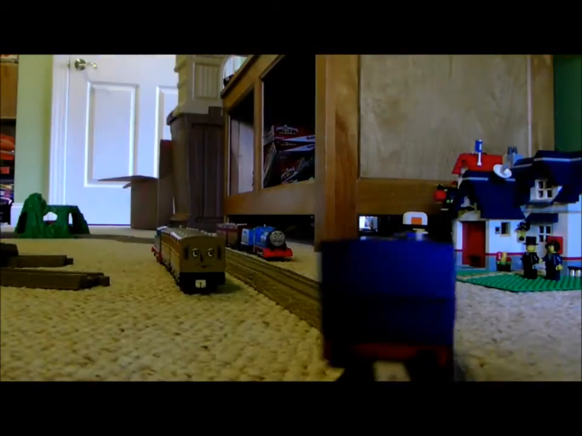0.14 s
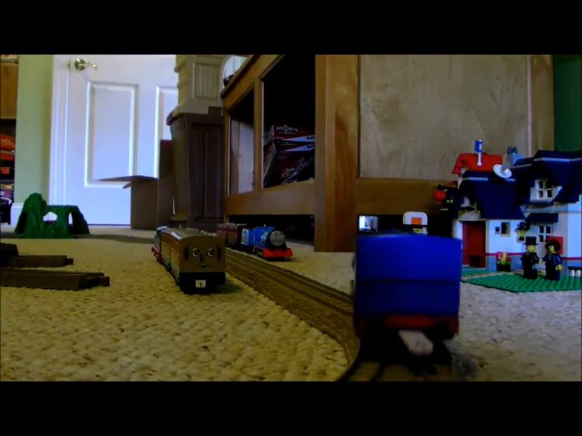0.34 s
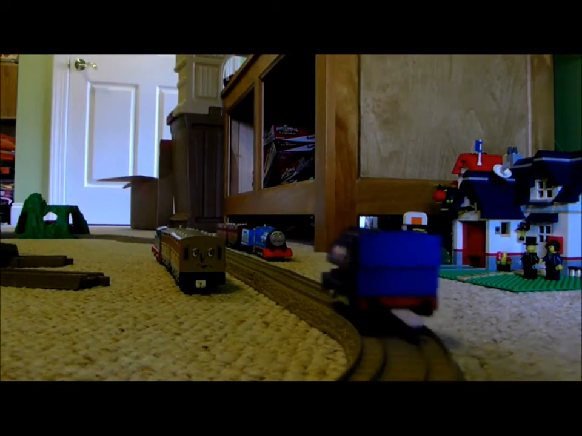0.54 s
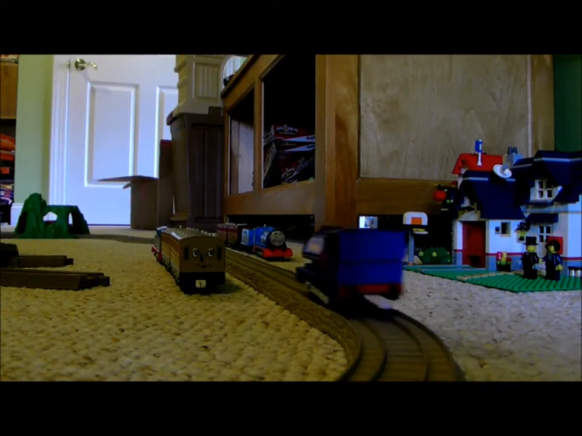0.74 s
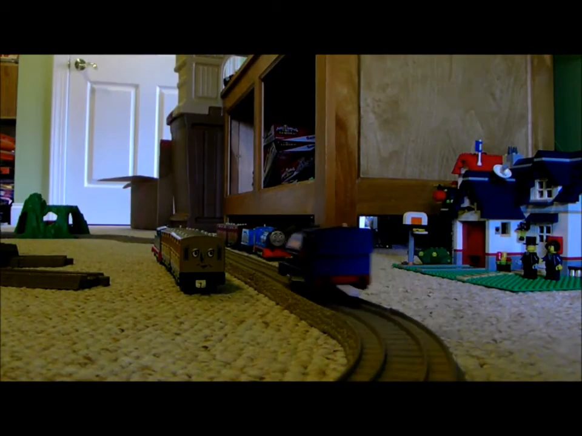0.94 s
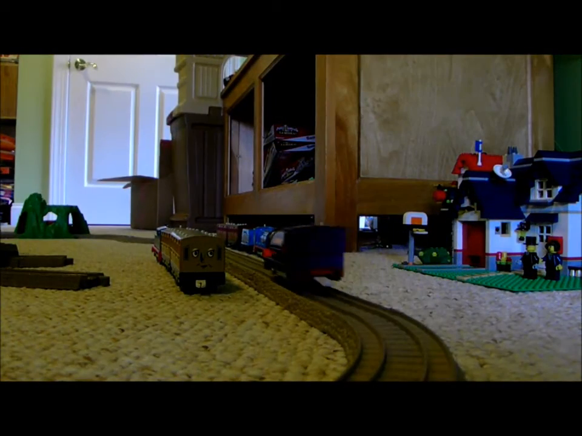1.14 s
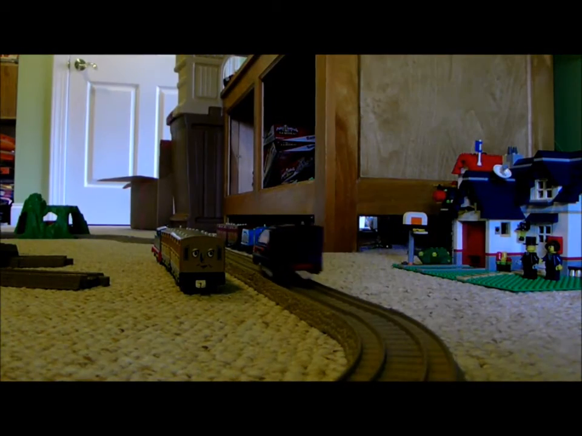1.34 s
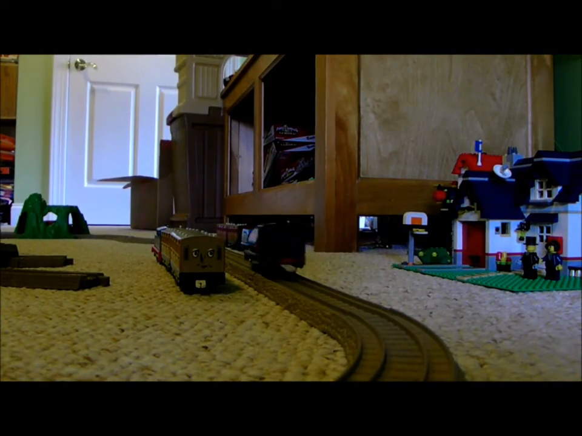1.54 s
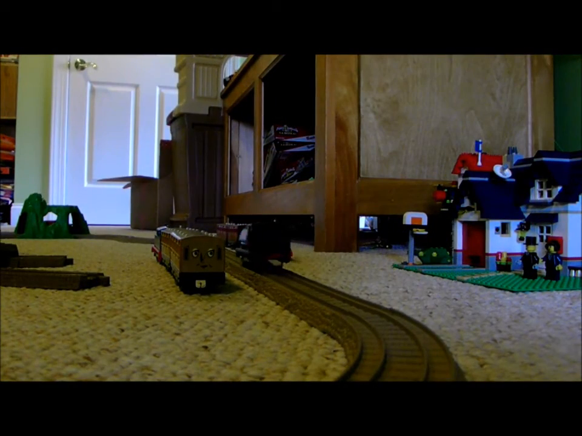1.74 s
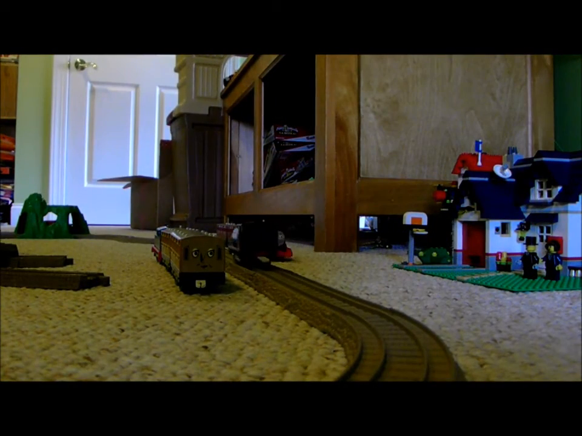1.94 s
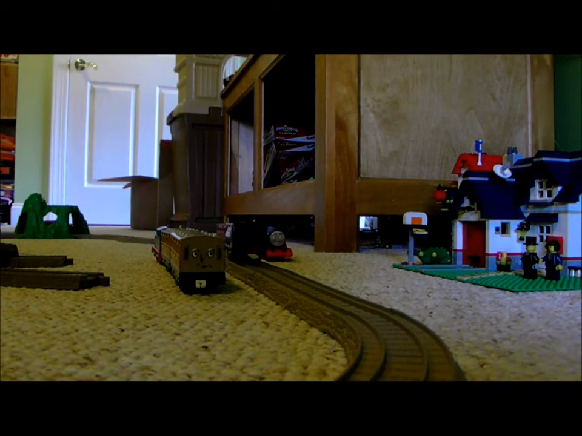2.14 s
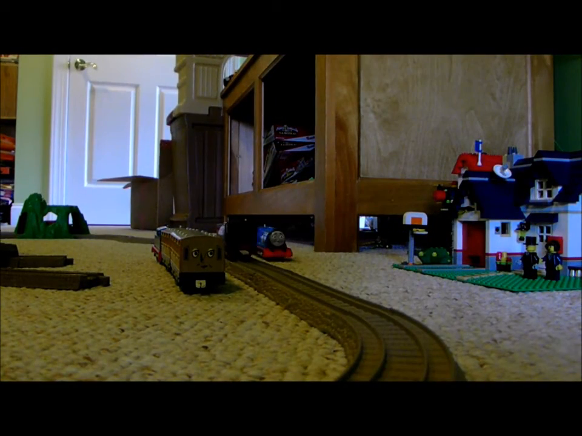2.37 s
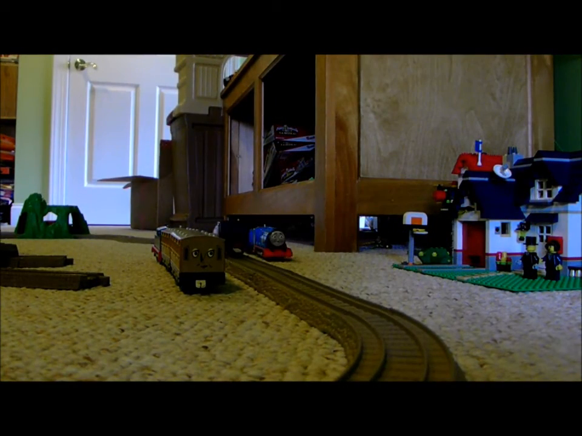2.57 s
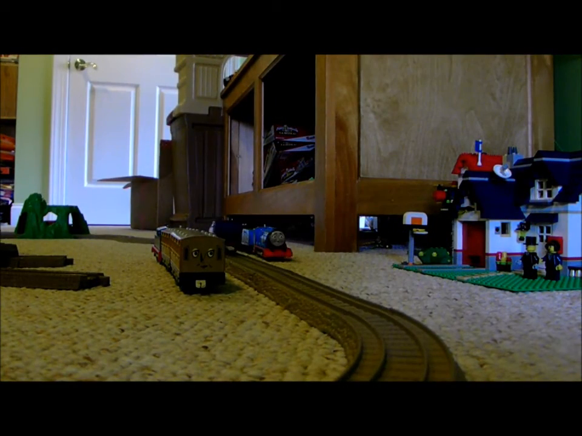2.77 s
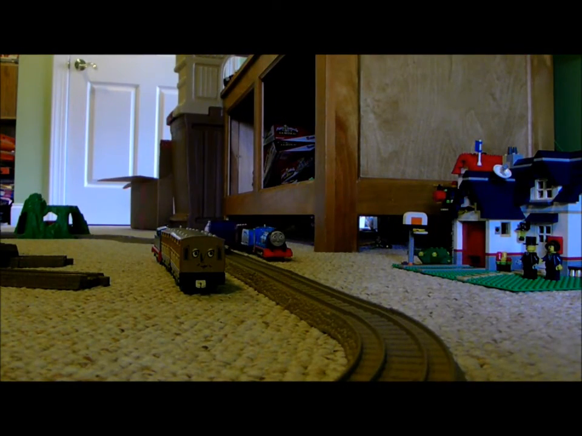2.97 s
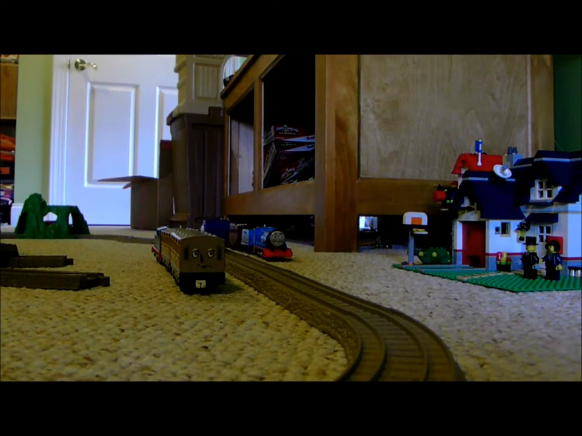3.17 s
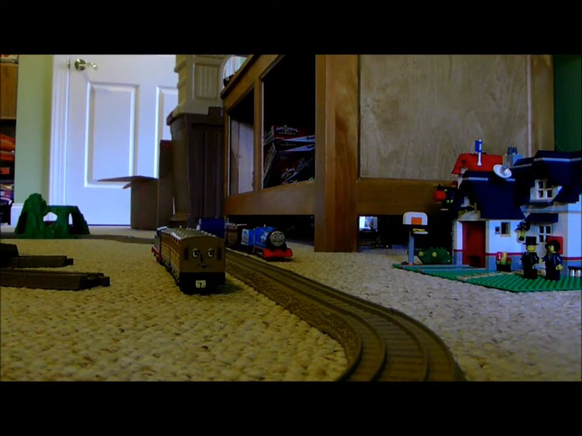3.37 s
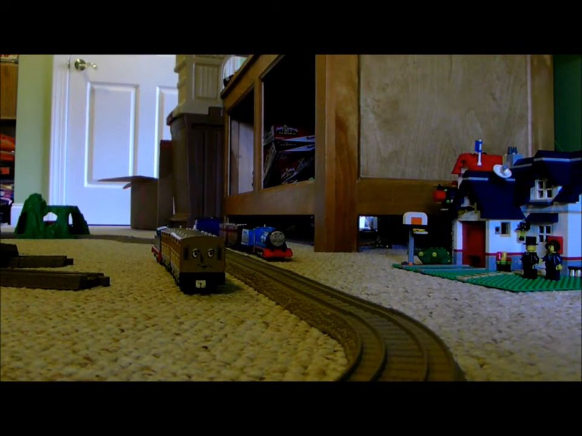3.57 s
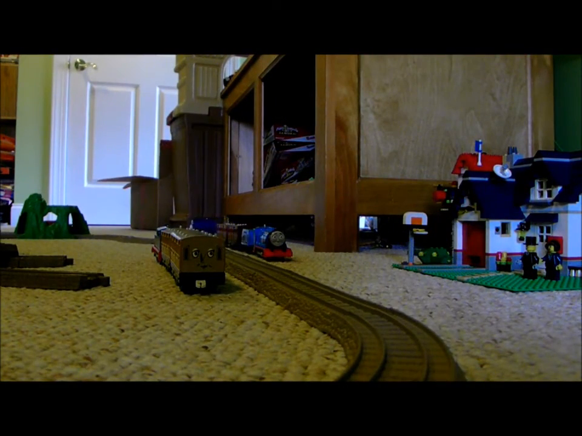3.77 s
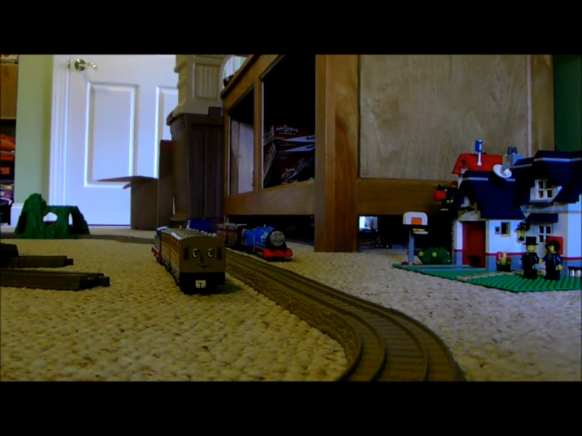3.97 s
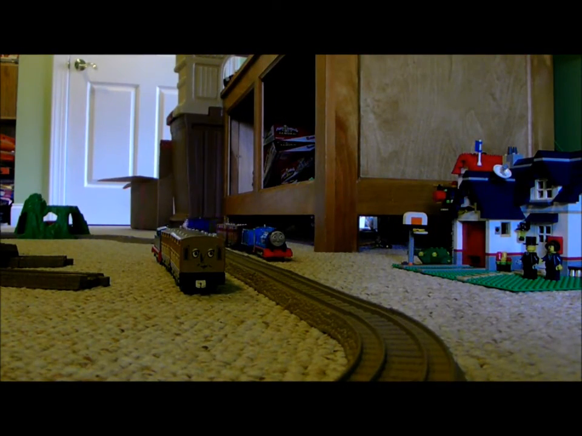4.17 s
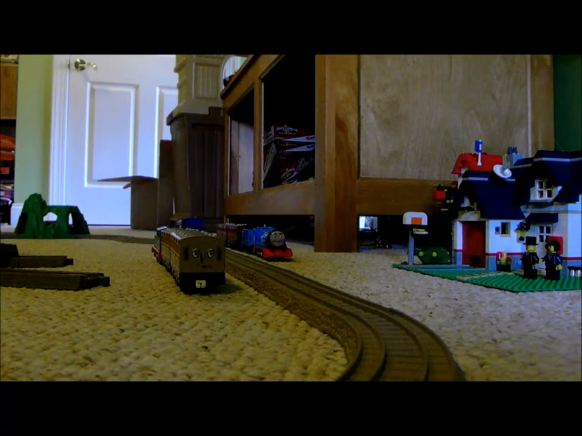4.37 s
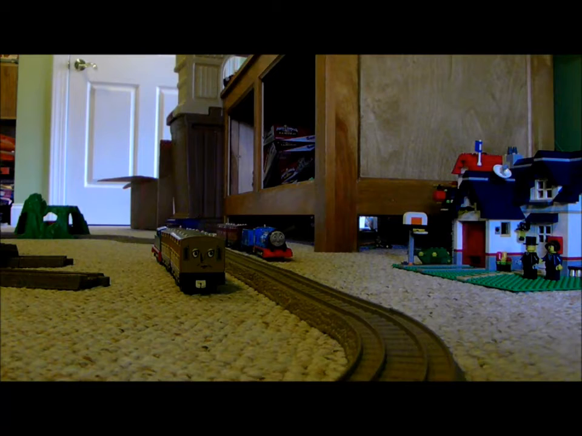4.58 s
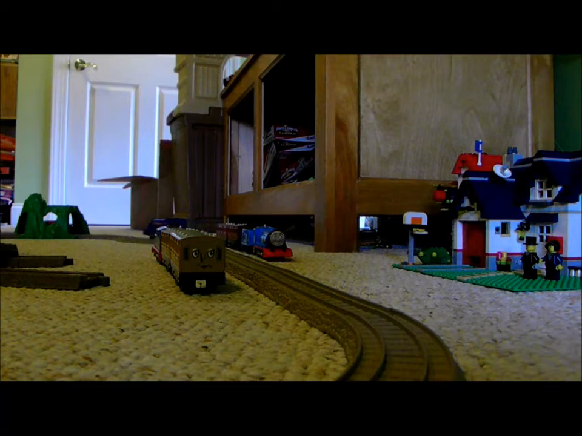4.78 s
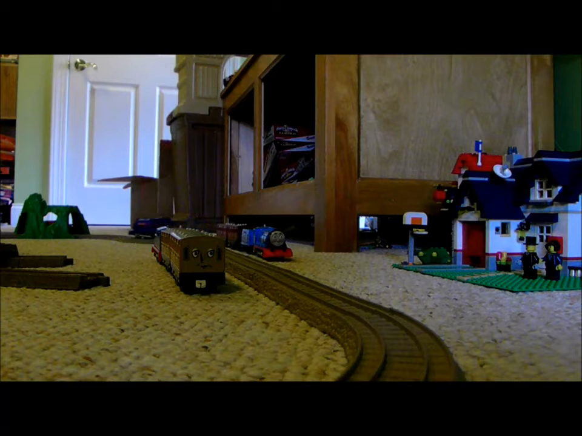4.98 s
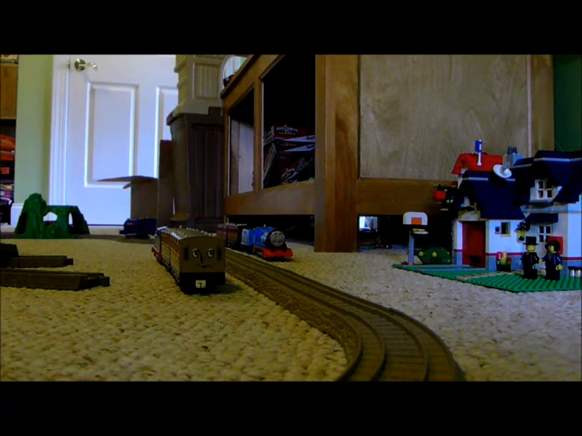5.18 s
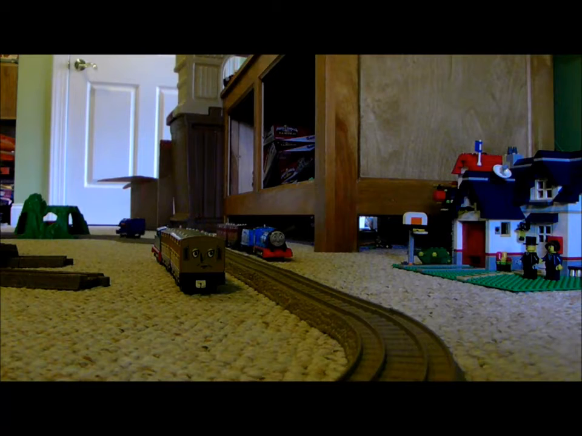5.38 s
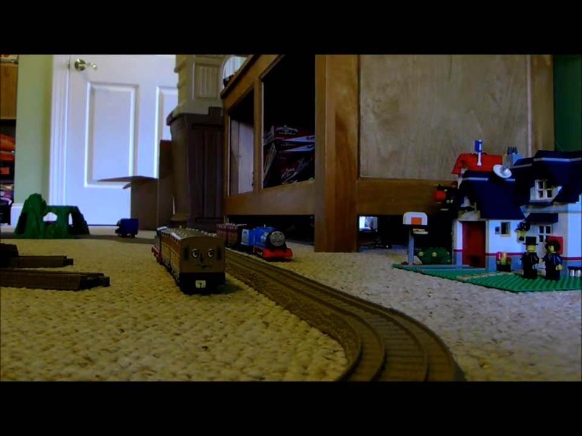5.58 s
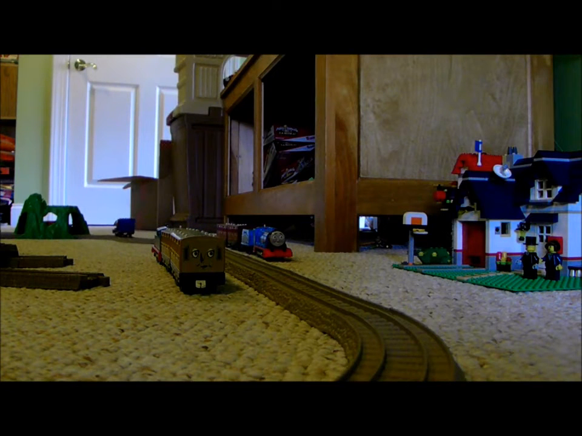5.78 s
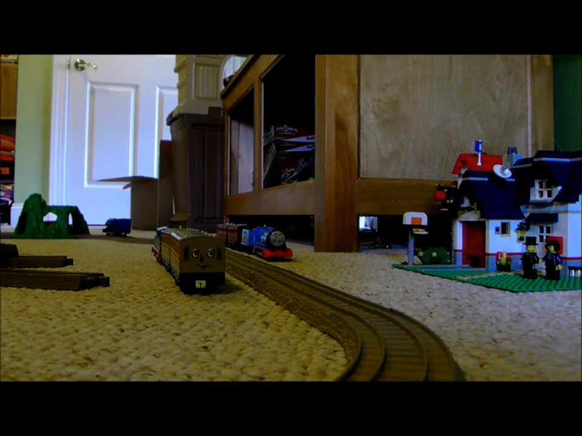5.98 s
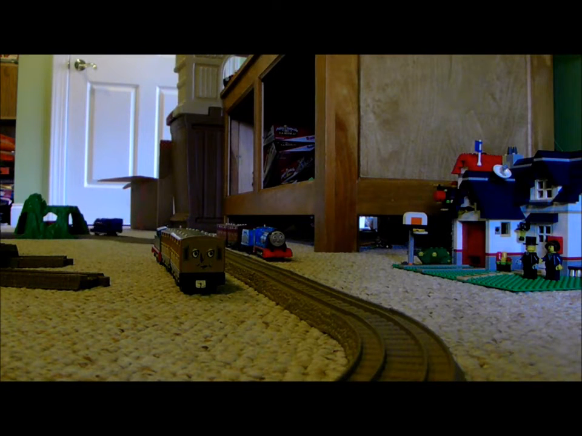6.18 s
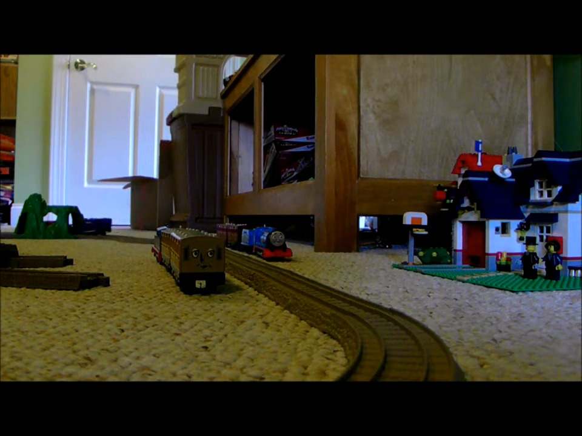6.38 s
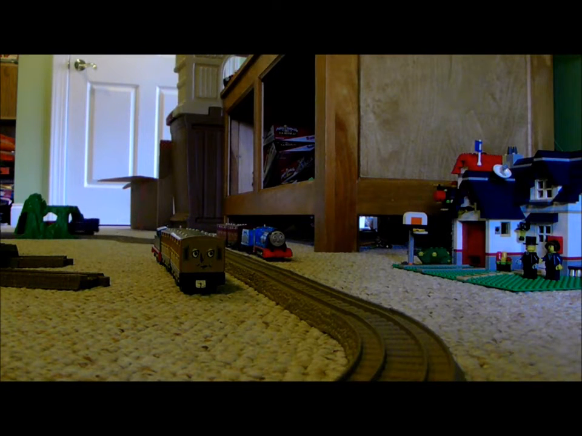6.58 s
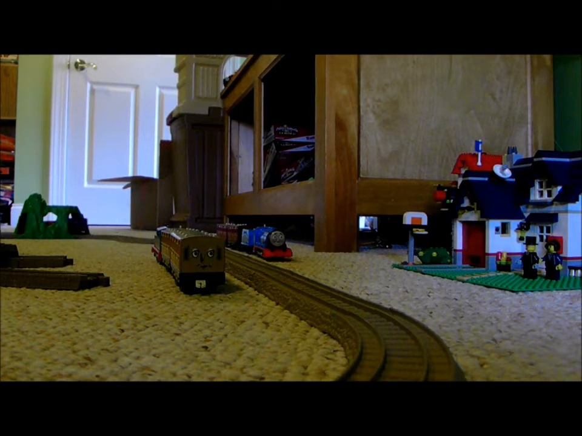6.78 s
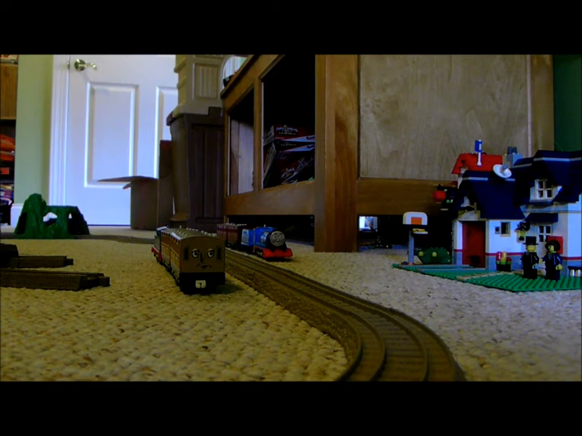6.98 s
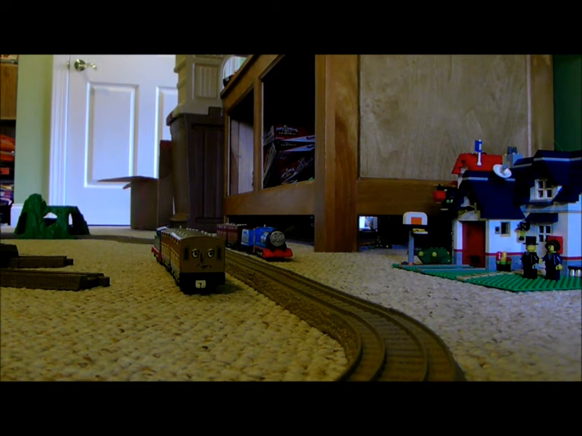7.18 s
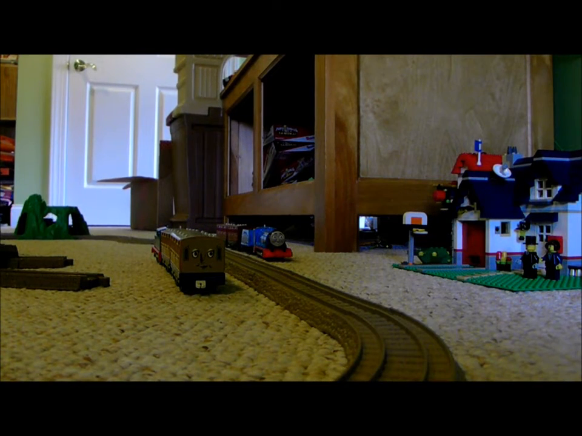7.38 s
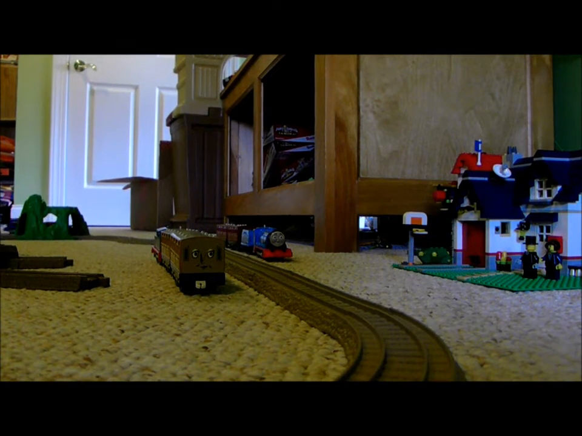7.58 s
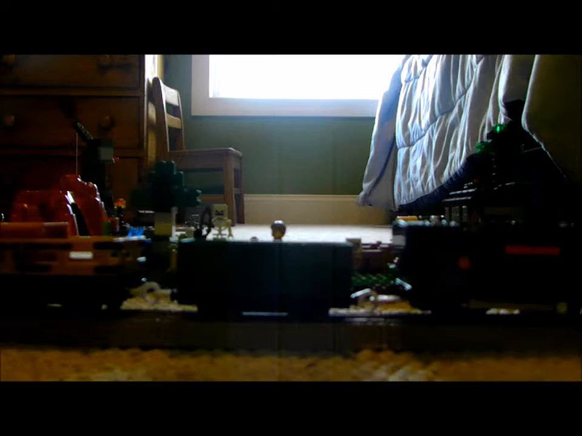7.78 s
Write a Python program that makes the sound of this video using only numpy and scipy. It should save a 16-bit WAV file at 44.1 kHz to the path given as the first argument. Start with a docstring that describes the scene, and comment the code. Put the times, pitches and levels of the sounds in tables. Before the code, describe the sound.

A battery toy train rattles harshly past on plastic track, its loose gears buzzing and whining, then runs on thinner and quieter across the room.

```python
"""The loose gears of a battery toy train rattle in its plastic shell as it runs away over plastic track on a carpet:
random tooth contacts are filtered by the shell and chassis, and their level follows the turning of the pinion.
A 14-tooth pinion on the small motor makes the mesh whine at multiples of the tooth rate. The wheels roll as
filtered noise, sharp gear slaps are bursts of contacts, and rail joints and one bump ring damped modes.
One small microphone hears it all through a notch, soft rounding of peaks and a steep upper cutoff."""
import sys
import numpy as np
from scipy import signal
from scipy.fft import rfft, irfft, next_fast_len
from scipy.io import wavfile

SR = 44100
rng = np.random.default_rng(int(sys.argv[2]) if len(sys.argv) > 2 else 0)


def wav_record(signal):
    """Record a signal, one row per channel, as 16-bit PCM in the file named by sys.argv[1]."""
    frames = np.transpose(np.atleast_2d(signal))
    bounded = np.clip(frames, -1, 1)
    # unit amplitude maps onto the largest positive 16-bit level
    quanta = np.round(bounded * 32767).astype(np.int16)
    wavfile.write(sys.argv[1], SR, quanta)


N = 344903   # length in samples

# Gear mesh. Each row: time in seconds, tooth rate in Hz before slack and jitter, whine level in dB before lulls.
MESH_COURSE = [(0, 1110, -39), (.1, 1080, -39), (.69, 1062, -40), (.85, 1109, -41), (1.6, 1107, -41),
               (1.94, 1098, -40), (2.3, 1120, -42), (2.8, 1129, -43.5), (3.45, 1109, -41.5),
               (3.8, 1117, -43.5), (4.3, 1114, -44.5), (4.9, 1095, -48), (5.2, 1095, -41),
               (5.5, 1081, -40.5), (5.8, 1115, -44), (6.2, 1088, -42), (6.4, 1112, -41.5),
               (7.0, 1112, -43.5), (7.5, 1106, -42), (7.82, 1072, -60)]
# Harmonics of the mesh. Each row: multiple of the tooth rate, mean level in dB relative to the whine.
WHINE_HARMONICS = [(1, -24.5), (2, 0.5), (3, -6.5), (4, -2.5), (5, -16)]
# Running noise before lulls and beats. Each row: time in seconds, shell rattle in dB, then in dB above the shell:
# thin upper rattle, finest fizz, chassis buzz.
RATTLE_COURSE = [(0, -15.5, -8, -16, -9), (0.15, -16, -10, -19, -10), (0.45, -19.5, -11.5, -23, -13),
                 (0.75, -17.5, -16.5, -21, -16.5), (1.2, -20, -15.5, -19, -12.5),
                 (1.7, -22, -12, -16, -10.5), (2.3, -22.5, -7, -15, -11), (2.7, -25, -8, -14.5, -11.5),
                 (3.3, -25.5, -5, -13, -9.5), (3.7, -25.5, -5.5, -14, -10), (4.3, -25, -5, -10, -8.5),
                 (4.8, -24, -7, -15, -10), (5.1, -26, -8, -14.5, -6.5), (5.6, -24, -6, -15, -8.5),
                 (6.1, -24, -10.5, -13, -8.5), (6.7, -25.5, -10.5, -16, -9.5),
                 (7.2, -26.5, -7.5, -12.5, -7.5), (7.82, -24, -10, -13.5, -7.5)]
# Wheels rolling on the rails. Each row: time in seconds, level in dB before lumps and dips.
ROLL_COURSE = [(0.0, -41), (0.52, -48.5), (1.79, -48), (4.31, -48.5), (5.1, -47), (6.88, -48),
               (7.82, -46.5)]
# Radiation spectra before the body resonances. Each row: frequency in Hz, relative level in dB per Hz.
SHELL_SPECTRUM = [(2240, -37), (3800, -40.5), (4190, -38), (4580, -2.5), (5140, -3.5), (5570, 1),
                  (6240, 3.5), (7110, -1), (7750, -2.5), (8000, -5.5), (10400, -58), (17600, -120)]
UPPER_SPECTRUM = [(7000, -15), (7800, -5), (8700, 1.5), (9800, 1), (10600, -2), (11150, -5.5),
                  (11500, -43.5), (12500, -36)]
FIZZ_SPECTRUM = [(10800, -19), (11500, -3), (13000, -5), (14200, -3), (14800, -15), (15600, -9.5)]
CHASSIS_SPECTRUM = [(530, -34), (900, -18.5), (1090, -19), (1860, -9.5), (2190, -6), (2810, -6),
                    (3260, -2.5), (4180, -3.5), (4500, -2), (5850, -37), (9900, -120)]
RAIL_SPECTRUM = [(12, -49), (20, -17), (91, -15), (187, -17), (339, -6.5), (543, -6), (1040, -1.5),
                 (1110, 8), (1190, -5), (1300, 0), (1690, -1), (2860, -120)]
# Resonances of shell and chassis. Each row: frequency in Hz, width in Hz, lift in dB (negative for a hollow).
BODY_RESONANCES = [(269, 28, 3), (420, 16, 1.5), (2034, 53, 4), (2510, 210, 3), (3350, 40, 2.5),
                   (4630, 250, -2.5), (4840, 150, 3), (5480, 130, 5), (5680, 90, 2), (5820, 110, 3),
                   (6050, 120, 2), (6290, 110, 3.5), (6930, 180, 4.5), (7000, 104, 2.5), (8540, 250, 3),
                   (10240, 250, 6), (10227, 540, -13), (10200, 880, 9), (13300, 500, -1.5),
                   (14100, 500, -2)]
# Sharp slaps of the loose gears. Each row: start in seconds, burst level in dB, length of the fade in seconds.
GEAR_SLAPS = [(.075, -20, .011), (0.122, -18, 0.054), (0.237, -13, 0.02), (0.326, -10, .03),
              (.416, -11.5, .015), (0.453, -13.5, 0.013), (0.496, -14.5, 0.011), (.528, -10.5, .009),
              (0.551, -14.5, 0.023), (0.594, -16, .021), (0.647, -14.5, 0.022), (0.772, -15.5, .014),
              (.857, -23, 0.04), (0.903, -17.5, 0.0087), (0.95, -12.5, 0.011), (1.06, -19, 0.015),
              (1.164, -23.5, .027), (1.254, -18.5, 0.02), (1.342, -17, 0.015), (1.48, -18, 0.012),
              (1.541, -17.5, 0.027), (1.62, -20, .014), (1.694, -21.5, 0.0097), (1.772, -22, .02),
              (1.84, -29, 0.072), (2.079, -23, .02), (2.162, -26, 0.036), (2.224, -26, .009),
              (2.331, -26, 0.0092), (2.507, -20, 0.018), (2.813, -26, .02), (3.054, -20, .015),
              (3.104, -21.5, 0.029), (3.262, -20.5, 0.028), (3.356, -20, 0.034), (3.6, -26, .027),
              (3.651, -29, 0.036), (4.13, -19, 0.023), (4.372, -22.5, .036), (4.84, -23.5, 0.044),
              (5.17, -27, 0.042), (5.371, -24.5, 0.058), (5.573, -26, .046), (5.69, -28, 0.053),
              (5.913, -28, .018), (6.087, -21.5, .024), (6.163, -22, .048), (6.391, -24.5, 0.03),
              (6.7, -29, 0.041), (7.169, -27.5, .042), (7.323, -23, 0.034), (7.5, -24, 0.025),
              (7.611, -21, 0.056)]
# Wheels over rail joints. Each row: time in seconds, strength of the blow in dB.
JOINT_BLOWS = [(0.274, -32), (0.321, -31.5), (0.42, -29), (0.615, -41), (0.717, -28.5), (1.124, -35),
               (1.319, -26), (1.418, -30.5), (1.517, -33), (1.622, -29), (1.715, -31), (1.819, -25.5),
               (3.37, -37), (5.114, -47), (5.383, -34), (7.715, -35)]
# Modes of the track. Each row: frequency in Hz, mean level in dB, 60 dB decay time in seconds.
TRACK_MODES = [(421, -18.5, 0.19), (527.5, -6.5, 0.036), (763, -9, .025), (970, -15, 0.028)]
# Bump of a coupling or wagon. Each row: time in seconds, strength of the blow in dB.
BUMP_BLOWS = [(5.662, -16.5)]
# Modes of the wagon. Each row: frequency in Hz, mean level in dB, 60 dB decay time in seconds.
WAGON_MODES = [(141.4, -32, 0.13), (424.4, -27, 0.22), (1070, -6, .04), (1370, -4, 0.034),
               (1730, -10, 0.05), (2300, 1, 0.0076), (3220, 4, 0.0045)]
# The drive goes slack and the rattle sinks. Each row: time in seconds, change of shell level in dB.
SLACK_LULLS = [(0.2, -2.5), (0.49, -2.5), (0.82, -4.0), (1.02, -4.0), (1.31, -1.76), (1.73, -4.0),
               (2.01, -5), (2.28, -2.5), (2.57, -3.5), (3.0, -2.5), (3.21, -1.38), (3.52, -4.5), (3.76, -3),
               (4.01, -3), (4.48, -2.5), (5.05, -5.5), (5.34, -3.5), (5.54, -2.5), (5.66, -3.5), (5.79, -5),
               (6.28, -2.5), (6.58, -4.0), (6.81, -3), (7.08, -3), (7.28, -3), (7.4, -2.5), (7.58, -2.5)]
# Broad noise falls away and thin tones sound through the gap. Each entry: time in seconds.
DIP_TIMES = [0.342, .851, 1.148, 1.192, 2.557, 2.707, 3.283, 3.41, 3.452, 4.007, 4.861, 4.991, 5.46, 5.543,
             6.183, 6.292, 6.696, 6.741, 6.804, 6.929, 7.634]

TEETH = 14
UPPER_FOLLOWS, FIZZ_FOLLOWS, CHASSIS_FOLLOWS, WHINE_FOLLOWS = 1.3, 0.77, 0.42, 1.8   # dB per dB of lull
SLACK_HZ_PER_DB, SLOWING_S = 14, 0.12   # gain in tooth rate, time constant of the speed
LULL_S = 0.035   # spread of the bell shape
DIP_S, DIP_DB = 0.0045, -18   # spread of the bell shape, depth
DIP_TONE_S, DIP_TONE_DB = 0.013, -10.5   # spread of the bell shape, level of each tone against the contacts
SLAP_RISE_S = 0.0029   # time constant
JOINT_CONTACT_S, BUMP_CONTACT_S = 0.004, 0.0017
NOTCH_HZ, NOTCH_WIDTH_HZ = 7850, 930
CUTOFF_HZ = 15730


def from_db(db):
    """Level law: amplitude is ten to the power of a twentieth of the decibels."""
    return 10 ** (np.asarray(db) / 20)


def rms_one(x):
    """Normalisation: a signal divided by its effective value has unit power."""
    return x / np.sqrt(np.mean(x ** 2) + 1e-20)


def in_time(rows):
    """Linear interpolation: each column after the first becomes a course in time."""
    seconds, *columns = np.transpose(rows)
    return [np.interp(np.arange(N) / SR, seconds, column) for column in columns]


def drift(rate_hz):
    """Low-pass random process: noise through two equal one-pole filters wanders slowly, with rms 1."""
    pole = np.exp(-20 * np.pi * rate_hz / SR)   # computed at a tenth of the sample rate
    noise = rng.standard_normal(N // 10 + 4002)
    slow = signal.lfilter([1], [1, -2 * pole, pole * pole], noise)[4000:]   # start-up discarded
    return np.interp(np.arange(N) / 10, np.arange(len(slow)), rms_one(slow))


def hollows(rows, spread_s):
    """Superposition of level changes: a bell-shaped hollow in dB at each listed moment."""
    t = np.arange(N) / SR
    return sum(db * np.exp(-0.5 * ((t - at_s) / spread_s) ** 2) for at_s, db in rows)


def whine(mesh, whine_db):
    """Gear-mesh harmonics: phase jitter blurs the upper ones most; the off-centre pinion makes them throb each turn."""
    throb = 1 + 0.27 * np.cos(mesh / TEETH + 1.2 * drift(24))
    wobble = 0.073 * np.sin(mesh / TEETH + 0.51 * drift(7.4)) + 0.36 * drift(37)
    lines = 0
    for multiple, db in WHINE_HARMONICS:
        level = from_db(db + 3.3 * drift(29))
        lines = lines + level * np.sin(multiple * (mesh + wobble) + 0.5 * drift(5.7))
    return np.sqrt(2) * from_db(whine_db) * throb * lines


def contacts(per_s, size_db, share):
    """Impulsive excitation: random tooth contacts of uneven size over a bed of sliding friction."""
    sizes = from_db(size_db * np.minimum(rng.exponential(1, N), 4)) * rng.choice([-1, 1], N)
    hits = rms_one(sizes * (rng.random(N) < per_s / SR))
    return np.sqrt(share) * hits + np.sqrt(1 - share) * rng.standard_normal(N)   # share of power in hits


def gear_contacts(turn, memory):
    """Cyclic repetition: the same flaws meet again, so each turn repeats part of the one before."""
    steps = 554   # per turn
    rows = contacts(3000, size_db=2.5, share=0.31)[:N // steps * steps].reshape(-1, steps)
    remembered = signal.lfilter([1], [1, -memory], rows, axis=0).ravel()
    place = (turn / (2 * np.pi) * steps).astype(int)
    return rms_one(remembered[place % len(remembered)])


def pings(per_s, cycles, count):
    """Damped resonance: chance contacts set small parts ringing, each decaying 60 dB in a fixed number of cycles."""
    pitches = np.geomspace(1400, 15000, count) * from_db(0.3 * rng.standard_normal(count))
    hits = from_db(3.0 * rng.standard_normal(N)) * (rng.random(N) < per_s / SR)
    dealt = rng.integers(0, count, N)
    out = 0
    for k, hz in enumerate(pitches):
        r, w = from_db(-60 * hz / (cycles * SR)), 2 * np.pi * hz / SR
        own_hits = hits * (dealt == k) + 1e-18
        ring = signal.lfilter([0, np.sin(w)], [1, -2 * r * np.cos(w), r * r], own_hits)
        out = out + hz * ring   # even power per hertz
    return rms_one(out)


def dip_tones(count):
    """Windowed sinusoids: short tones at chance pitches swell and fade across each dip."""
    out, reach = np.zeros(N), SR // 30
    age = np.arange(-reach, reach) / SR
    swell = np.exp(-0.5 * (age / DIP_TONE_S) ** 2)
    for at_s, (place, start) in zip(DIP_TIMES, rng.random((len(DIP_TIMES), 2, count, 1))):
        hz = 1000 + 10500 * place
        tones = np.sin(2 * np.pi * (hz * age + start)).sum(axis=0)
        middle = round(at_s * SR)
        out[middle - reach:middle + reach] += tones * swell
    return from_db(DIP_TONE_DB) * out


def coloured(x, spectrum):
    """Linear filtering: a radiation spectrum and the body resonances shape the excitation; rms 1."""
    size = next_fast_len(N)
    hz = np.maximum(np.arange(size // 2 + 1) * SR / size, 1)
    points = np.array(spectrum)
    db = np.interp(np.log(hz), np.log(points[:, 0]), points[:, 1], left=-120)
    for top_hz, width_hz, lift_db in BODY_RESONANCES:
        db = db + lift_db / (1 + (2 * (hz - top_hz) / width_hz) ** 2)
    return rms_one(irfft(rfft(x, size) * from_db(db), size)[:N])


def patchy(x, low_hz, high_hz, patchy_db, rate_hz, count):
    """Random colour change: each slice of pitch swells and sinks by chance, independently of the others."""
    size = next_fast_len(N)
    hz = np.arange(1, size // 2 + 2) * SR / size
    place = np.clip(np.log(hz / low_hz) / np.log(high_hz / low_hz), 0, 1)
    spectrum = rfft(x, size)
    out = 0
    for k in range(count):
        band = np.clip(1 - abs(place * (count - 1) - k), 0, 1)   # overlapping triangles
        out = out + from_db(patchy_db * drift(rate_hz)) * irfft(spectrum * band, size)[:N]
    return rms_one(out)


def rattle(turn, dip_db, lull_db):
    """Modulated excitation: the off-centre pinion loads the gears, and all parts of the body feel the same jolts."""
    shell_db, upper_db, fizz_db, chassis_db = in_time(RATTLE_COURSE)
    beat = np.cos(turn + 0.61 * drift(2.7)) + 1.3 * np.cos(2 * turn) + 0.5 * np.cos(turn / 2 + drift(10.0))
    jolt = drift(52.5)
    teeth = gear_contacts(turn, memory=0.35) + from_db(-7.5) * pings(500, cycles=470, count=84)
    teeth = from_db(dip_db) * teeth + dip_tones(count=9)

    shell = patchy(coloured(teeth, SHELL_SPECTRUM), 4640, 7900, patchy_db=-1.0, rate_hz=1.6, count=8)
    upper = patchy(coloured(teeth, UPPER_SPECTRUM), 8600, 11000, patchy_db=-1.0, rate_hz=27, count=5)
    chassis = patchy(coloured(teeth, CHASSIS_SPECTRUM), 720, 4540, patchy_db=1.5, rate_hz=6.4, count=9)
    fizz = coloured(teeth, FIZZ_SPECTRUM)

    shell_swing_db = lull_db + 0.62 * beat + 0.68 * jolt
    upper_db = upper_db + UPPER_FOLLOWS * lull_db + 0.96 * beat + 1.93 * jolt
    fizz_db = fizz_db + FIZZ_FOLLOWS * lull_db + 0.64 * beat + 1.3 * jolt + 2.2 * drift(11)
    chassis_db = chassis_db + CHASSIS_FOLLOWS * lull_db + 0.41 * beat + 1.3 * jolt
    body = from_db(shell_swing_db) * shell + from_db(upper_db) * upper
    body += from_db(fizz_db) * fizz + from_db(chassis_db) * chassis
    return from_db(shell_db) * body


def rolling(dip_db):
    """Rolling noise: random contact of plastic wheels on the rails gives a low, slightly lumpy roll."""
    roll_db, = in_time(ROLL_COURSE)
    roll = coloured(rng.standard_normal(N), RAIL_SPECTRUM)
    roll = patchy(roll, 173, 1400, patchy_db=1.5, rate_hz=1.84, count=6)
    lumps_db = 1.5 * drift(15)
    return from_db(roll_db + lumps_db + dip_db) * roll


def slaps():
    """Transient excitation: each slap is a burst of contacts that swells fast and fades, heard through the shell."""
    t, burst = np.arange(N) / SR, np.zeros(N)
    for start_s, db, length_s in GEAR_SLAPS:
        part = slice(int(start_s * SR), int((start_s + 6 * length_s) * SR))
        age = np.maximum(t[part] - start_s, 0)
        swell = 1 - np.exp(-age / SLAP_RISE_S)
        fade = np.exp(-0.5 * (age / length_s) ** 2)
        burst[part] += from_db(db) * swell * fade
    grit = contacts(2300, size_db=2.0, share=0.99)
    body = coloured(grit, SHELL_SPECTRUM)
    body += from_db(-8.0) * coloured(grit, UPPER_SPECTRUM) + from_db(-17) * coloured(grit, FIZZ_SPECTRUM)
    high_pass = signal.butter(4, 2500, "high", fs=SR, output="sos")
    return signal.sosfilt(high_pass, burst * body)


def struck(blows, modes, spread_db, contact_s):
    """Modal excitation: a short smooth push rings every mode, each with a chance strength of its own."""
    at = [round(at_s * SR) for at_s, db in blows]
    blow_db = np.array(blows)[:, 1]
    chance = rng.standard_normal((len(at), len(modes)))
    out = np.zeros(N)
    for k, (hz, level_db, t60_s) in enumerate(modes):
        clicks = np.full(N, 1e-18)
        clicks[at] = from_db(blow_db + level_db + spread_db * chance[:, k])
        r, w = from_db(-60 / (t60_s * SR)), 2 * np.pi * hz / SR
        rise = np.hanning(int(contact_s * SR) + 3)
        push = rise * np.cos(w * np.arange(len(rise))) * 2 / rise.sum()   # the ring swells over the contact
        pushes = np.convolve(clicks, push)[:N]
        out += signal.lfilter([0, np.sin(w)], [1, -2 * r * np.cos(w), r * r], pushes)
    return out


def rail_joints():
    """Impact response of the track: wheels knock on the rail joints and ring its modes."""
    return struck(JOINT_BLOWS, TRACK_MODES, spread_db=3, contact_s=JOINT_CONTACT_S)


def wagon_bump():
    """Impact response of the wagon: a coupling or wagon bumps and rings its modes."""
    return struck(BUMP_BLOWS, WAGON_MODES, spread_db=1, contact_s=BUMP_CONTACT_S)


def mesh_phase(tooth_hz, lull_db):
    """Load and speed: slack gears speed up and slow again under load; phase is the sum of the tooth rate."""
    keep = np.exp(-1 / (SLOWING_S * SR))
    slack_db = signal.lfilter([1 - keep], [1, -keep], lull_db - lull_db.mean())
    tooth_hz = tooth_hz - SLACK_HZ_PER_DB * slack_db   # lulls are negative, so slack raises the rate
    return 2 * np.pi * np.cumsum(tooth_hz * (1 + 0.003 * drift(5.93))) / SR


def scene():
    """Superposition: gears, wheels and knocks add up, alike in both channels."""
    tooth_hz, whine_db = in_time(MESH_COURSE)
    dip_db = hollows([(at_s, DIP_DB) for at_s in DIP_TIMES], DIP_S)
    lull_db = hollows(SLACK_LULLS, LULL_S)
    mesh = mesh_phase(tooth_hz, lull_db)
    gears = whine(mesh, whine_db + WHINE_FOLLOWS * lull_db) + rattle(mesh / TEETH, dip_db, lull_db)
    gears += from_db(dip_db) * slaps()
    train = gears + rolling(dip_db) + rail_joints() + wagon_bump()
    return np.array([train, train])


def record(dry):
    """Microphone response: the port has one deep notch, peaks are rounded and the top is cut."""
    notch = signal.iirnotch(NOTCH_HZ, NOTCH_HZ / NOTCH_WIDTH_HZ, fs=SR)
    notched = signal.lfilter(*notch, dry) + from_db(-37.5) * dry   # a little sound passes the notch
    rounded = 0.95 * np.tanh(notched / 0.95)
    top_cut = signal.ellip(16, 0.5, 90, CUTOFF_HZ, fs=SR, output="sos")
    return signal.sosfilt(top_cut, rounded)


dry = scene()
out = record(dry)
wav_record(out)
```